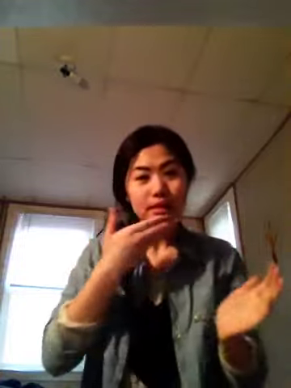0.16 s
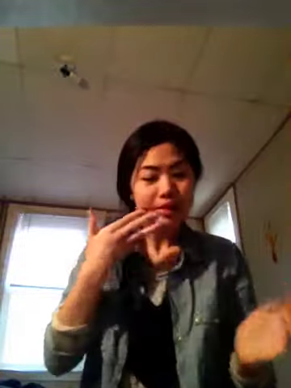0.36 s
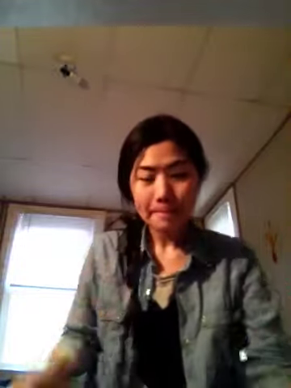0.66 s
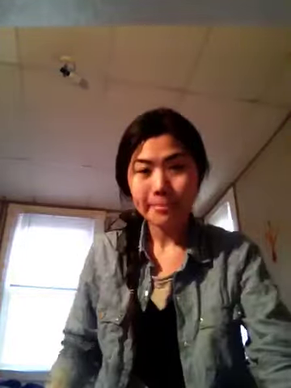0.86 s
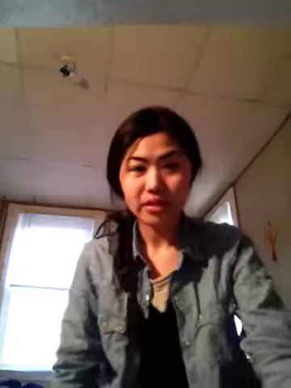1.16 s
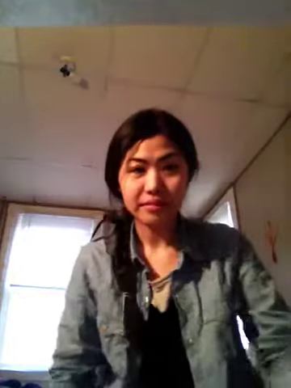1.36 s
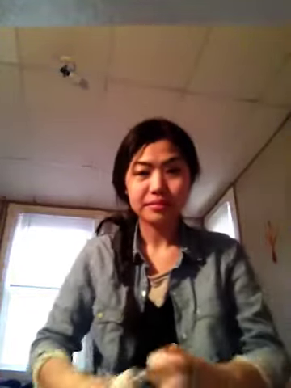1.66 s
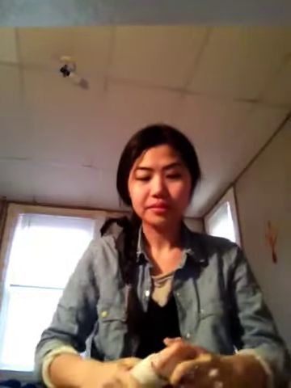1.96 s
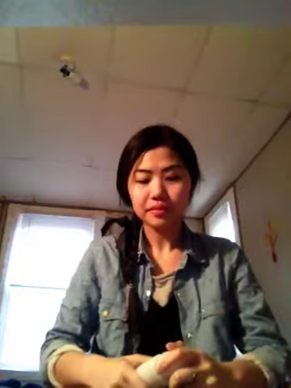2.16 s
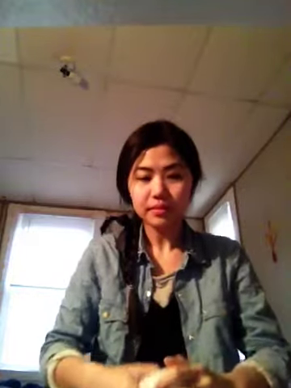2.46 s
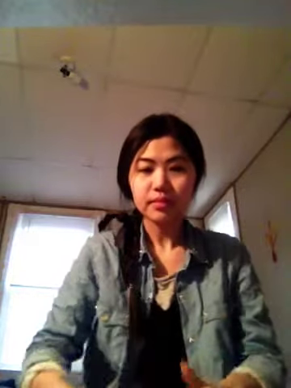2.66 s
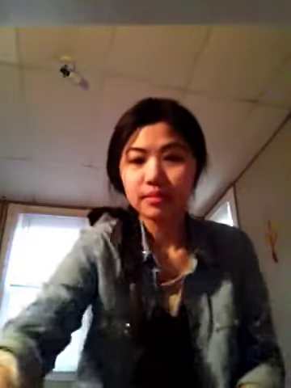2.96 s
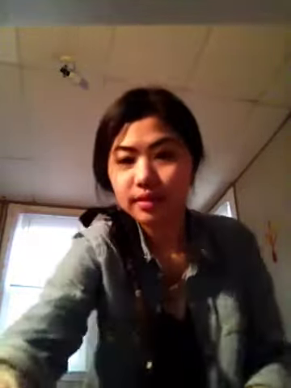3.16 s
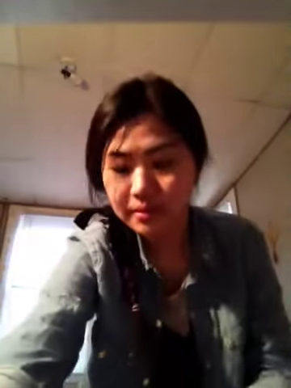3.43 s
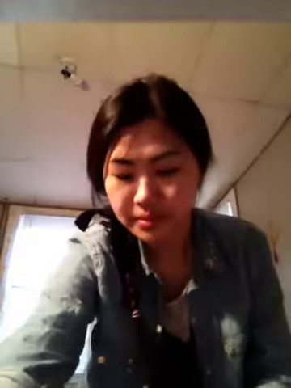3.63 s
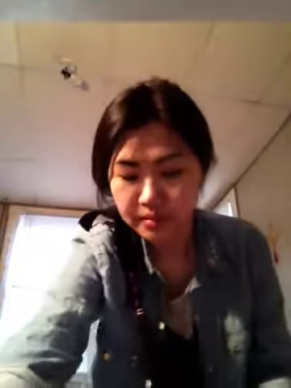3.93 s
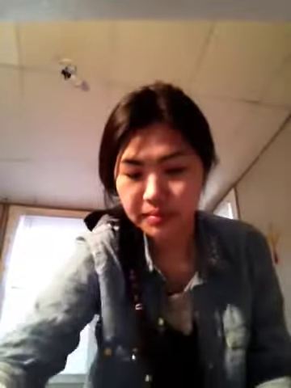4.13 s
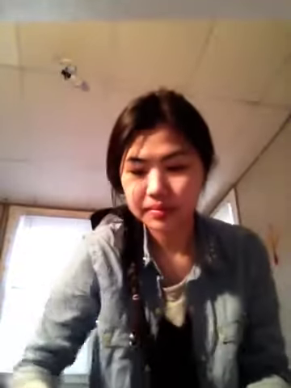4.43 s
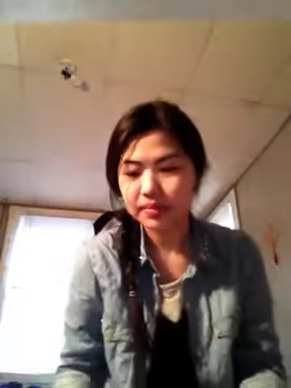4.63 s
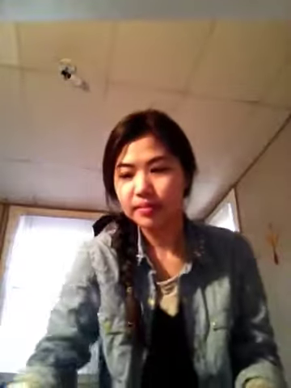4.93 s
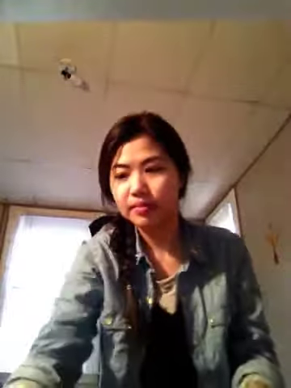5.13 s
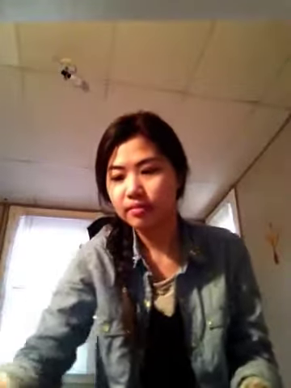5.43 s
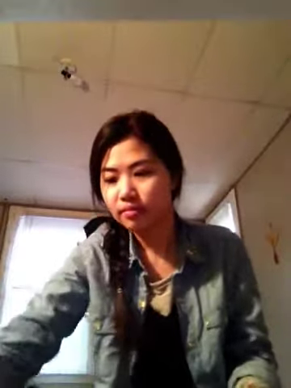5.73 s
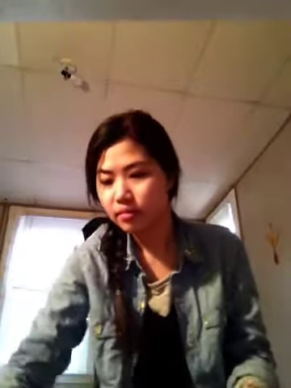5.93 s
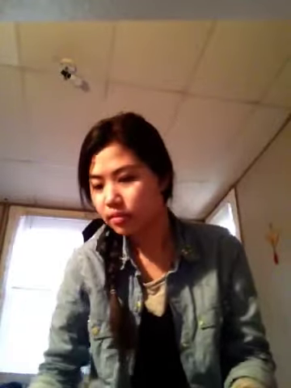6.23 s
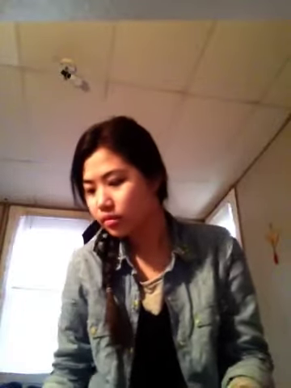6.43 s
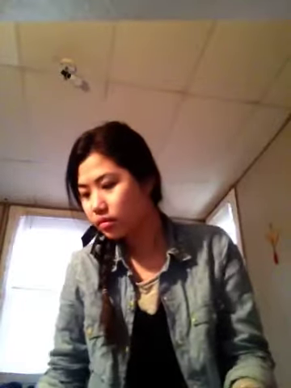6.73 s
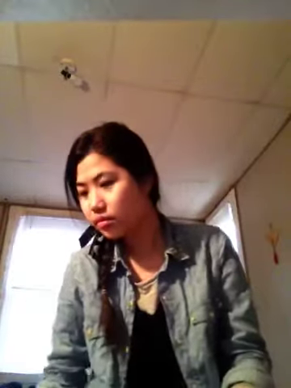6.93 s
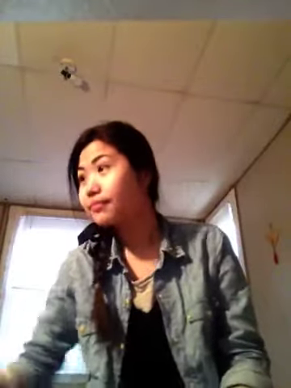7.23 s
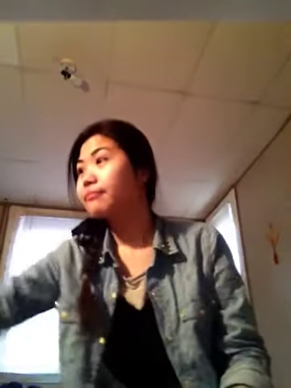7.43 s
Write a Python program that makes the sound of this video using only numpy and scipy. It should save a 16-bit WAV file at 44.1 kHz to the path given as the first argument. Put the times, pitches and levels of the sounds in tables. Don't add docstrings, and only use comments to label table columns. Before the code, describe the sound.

Small hard plastic jars, caps and tubes snap, knock, slide and click on a wooden desk in a quiet, faintly humming room.

```python
import sys
import numpy as np
from scipy import signal
from scipy.fft import rfft, irfft, next_fast_len
from scipy.io import wavfile
from scipy.ndimage import uniform_filter1d, map_coordinates

SR = 44100
rng = np.random.default_rng(int(sys.argv[2]) if len(sys.argv) > 2 else 0)


def field_ratio(decibels):
    return 10 ** (np.asarray(decibels, dtype=float) / 20)


def dump(signal):
    limited = np.clip(np.atleast_2d(signal).T, -1, 1)
    pcm = np.round(limited * 32767).astype(np.int16)
    wavfile.write(sys.argv[1], SR, pcm)


N = 334763

# start_s, peak_db, treble_db, t60_s, pitch_factor
TICK_HITS = [(.044, -50, 9, 0.0027, 0.68), (.076, -59, 15, 0.0078, 0.76), (.142, -57, 13.5, .0054, 1.8),
             (.975, -48, -20, .0067, 1), (1.004, -62, -20, 0.0055, 1.0), (1.099, -45, -6, 0.0036, 1.05),
             (1.294, -50, -9, 0.0033, 0.89), (1.317, -52, -15, .005, 0.94), (1.547, -49, -25, 0.0074, 0.99),
             (2.503, -43.5, -10, 0.0063, 0.49), (2.531, -68.5, 15, 0.0065, .91),
             (2.845, -64.5, 19.5, 0.0073, .71), (2.881, -52, -6, 0.01, 1.05), (2.894, -51, 2, 0.0082, 0.36),
             (3.069, -39.5, 1.5, 0.021, 0.68)]
ELBOW_HITS = [
    (.929, -44.5, -22, 0.031, 0.68),
    (.952, -33, -18, 0.01, 0.94),
    (1.255, -46, -14, 0.014, 0.82),
    (1.299, -46.5, -6, 0.0084, 0.93),
    (1.329, -59, -14, 0.019, 0.51),
]
JAR_HITS = [
    (1.722, -18.5, -7.5, .005, 0.95),
    (1.7295, -25.5, -0.5, .0092, 0.47),
    (1.733, -4.5, -5.5, .007, 0.97),
    (1.752, -27, -15, .0089, 0.73),
    (1.781, -27, -8.5, .021, 0.78),
]
LID_HITS = [
    (1.851, -23, -2.5, 0.011, 0.98),
    (1.862, -27, -13, 0.014, 1.1),
    (1.897, -37.5, -30, 0.012, 0.89),
    (1.942, -39, 5.5, 0.0022, 1.1),
    (1.95, -36.5, -21.5, .0066, 0.93),
]
CAP_HITS = [
    (2.052, -19.5, -0.61, 0.012, 0.99),
    (2.0585, -19, 2.5, 0.0083, 0.9),
    (2.2135, -22.5, -2, 0.008, .8),
    (2.232, -6.5, -1, 0.012, 0.97),
]
CASE_EDGE_HITS = [
    (3.2075, -6, -17, 0.0016, 0.864),
]
CASE_HITS = [
    (3.232, -20, -6, 0.017, 0.62),
    (3.311, -34, 5, 0.027, 0.6),
    (3.387, -28.5, -1.5, 0.013, 1.25),
    (3.45, -32, -4, 0.015, 1.25),
    (3.773, -14.5, -12, 0.012, 0.969),
    (3.79, -22.5, -13.5, 0.006, 0.85),
    (4.106, -23.5, -20, 0.022, 0.48),
]
CASE_FLAT_HITS = [
    (3.221, -33, -13, .01, 1),
    (4.085, -39, 6, 0.019, 0.45),
    (4.0965, -22.5, 0, 0.018, 0.67),
    (4.119, -28, -5, 0.018, 0.92),
]
PILE_HITS = [
    (5.171, -36, -6, .008, 1.17),
    (5.7975, -36, 0, 0.0052, 1.55),
    (5.818, -32.5, -28, 0.014, 0.56),
    (5.849, -31.5, -8, 0.0046, 1.24),
    (5.855, -30, -15, 0.0025, 0.976),
    (5.883, -41, -7, 0.0039, 1.0),
    (6.093, -60, -9.5, 0.015, 0.98),
    (6.119, -57.5, -12.5, 0.014, 0.88),
    (6.198, -69, -6, .015, 0.88),
]
TUBE_HITS = [
    (5.423, -20.5, -8.5, 0.0097, 0.97),
    (5.443, -42, 3, 0.0027, 0.94),
    (5.619, -35, -1.5, 0.034, 1.0),
]
ROLL_HITS = [
    (5.762, -38, -14, .006, 1.03),
    (5.773, -44, -6, .006, 1.1),
]

# centre_hz, width_hz, level_db
TICK_BODY = [(1950, 260, 0), (3850, 1300, -18)]
ELBOW_BODY = [(510, 200, 5), (905, 340, -7.5)]
JAR_BODY = [(850, 300, -30), (1520, 160, -14), (1915, 130, 7), (2229, 150, -12), (3200, 700, -34)]
LID_BODY = [(840, 99, -11.5), (1469, 112, 5.5), (2600, 270, -8), (3730, 890, -14.5)]
CAP_BODY = [(800, 320, 1), (1370, 500, 5.5), (2900, 640, 6.5), (3980, 900, -2.5)]
CASE_BODY = [(620, 360, 3), (764, 66, 6.2), (971, 200, 2), (1640, 500, 2.94), (2610, 120, 1.9)]
PILE_BODY = [(830, 410, 0.5), (1620, 100, 2.9), (2740, 200, 2)]
TUBE_BODY = [(797, 42, -5.5), (1227, 113, -5.5), (1970, 160, -14), (2740, 100, -4.5), (3780, 240, -9)]
ROLL_BODY = [(1100, 180, 12), (1820, 310, -3), (2240, 200, 9.5), (3760, 330, -2)]
# centre_hz, width_hz, level_db
THIN_SHELL = [(3960, 260, -2), (5010, 450, 4.5), (6000, 580, 4.5), (7600, 1700, -1.5), (10600, 2200, -9.5),
              (13200, 2500, -15.5)]
TICK_SHELL = [(5390, 2100, 0.5), (7440, 2000, -9)]
CAP_SHELL = [(4700, 1100, 5.5), (6004, 2000, 5.5), (8856, 3300, -1.5), (12600, 6000, -9)]
# centre_hz, width_hz, level_db
DESK_TOP = [(110, 14, -3.5), (170, 17, 4), (285, 290, -1), (504, 390, -1.5)]
DESK_FRAME = [(66, 14, -16), (87, 7, -5), (118, 8, -8), (176, 8, 2)]
DRAG_BODY = [(870, 51, -7), (1685, 110, 2), (2370, 200, -7)]

# freq_hz, density_db
RUB_SPECTRUM = [(290, -32), (500, -8), (755, -4), (835, -4), (1140, -5), (1260, -1.5), (1580, -3.5),
                (1950, -3), (3200, -11), (4160, -30), (7040, -120)]
FIZZ_SPECTRUM = [(1650, -34), (2800, -2.5), (3300, -1.5), (3780, 2), (4960, 3), (6660, 3), (9590, -10),
                 (12500, -21.5), (15500, -33)]
CLOTH_SPECTRUM = [(5000, -40), (7500, -4), (9500, -6), (13000, -11.5), (15500, -17), (17000, -60)]
AIR_SPECTRUM = [(15, -73), (25, -48), (84, -23), (108, -11), (217, -4.5), (285, -20), (326, -12.5),
                (545, -19), (677, -21), (734, -18), (1190, -20), (1440, -19), (2690, -21.5), (14800, -25),
                (16000, -35)]
# freq_hz, t60_s
ROOM_DECAY = [(200, 0.23), (1000, 0.25), (4000, 0.2), (12000, 0.24)]

# time_s, level_db
HUM_LEVEL = [(0, -86), (1, -74), (2.3, -78), (2.6, -68.5), (2.9, -63), (3.2, -67), (4.4, -74), (5.5, -75),
             (6.1, -70), (6.7, -80), (7.2, -69.5), (7.59, -77)]
# pitch_hz, level_db
FAINT_TONES = [(549, -89.5), (721, -92.5)]
# time_s, change_db
HISS_DUCK = [(2.2, 0.5), (2.5, -2.5), (3.2, 0)]
# start_s, level_db
FRAME_BLOWS = [
    (.955, -60),
    (3.21, -55),
    (3.778, -39),
    (4.106, -36),
]
# time_s, level_db
DRAG_LEVEL = [(3.85, -71), (3.95, -50.5), (4.05, -43.5), (4.09, -41.5), (4.12, -83)]
# peak_s, level_db, rise_20db_s, fall_20db_s, treble_db
LIGHT_STROKES = [(.728, -62, .01, .35, 6), (.8, -50.5, .06, .055, -7), (1.055, -65.5, .035, .05, 3),
                 (1.152, -55, .02, .026, 0), (3.23, -35, .02, .021, -3), (3.335, -49, .022, .15, 5),
                 (3.388, -43, .055, .04, 0), (3.506, -49, .04, .15, -6), (3.582, -44.5, .12, .1, -5),
                 (3.705, -50.5, .24, .045, 3), (3.765, -52, .1, .02, -5), (3.86, -54.5, .08, .15, -11),
                 (3.96, -51.5, .055, .17, 4), (4.07, -46.5, .17, .06, 6), (3.44, -52, .04, .06, -9),
                 (4.12, -52, .03, .07, 2), (4.26, -64, .02, .22, -6), (5.143, -59, .007, .08, 4),
                 (5.205, -53.5, .03, .06, -3), (5.255, -54.5, .045, .045, -3),
                 (5.318, -45.5, .028, .045, 0), (5.485, -53.5, .045, .022, 0), (5.59, -63, .12, .03, -4),
                 (5.701, -68, .04, .3, 4), (6.1, -56.5, .04, .04, -2), (6.195, -65.5, .07, .06, 2)]
# peak_s, level_db, rise_20db_s, fall_20db_s, treble_db
PRESSED_STROKES = [(.96, -60, .012, .12, -9), (3.213, -33, .003, .016, -5), (3.314, -39, .005, .014, 2),
                   (3.775, -32, .003, .014, -8), (5.175, -57.5, .006, .05, 3), (5.44, -47, .008, .03, -15),
                   (5.799, -49, .006, .06, 1), (5.852, -50, .01, .08, -5), (4.15, -57.5, .02, .06, -18),
                   (3.453, -50, .012, .015, 1), (1.32, -73, .15, .1, -3), (3.262, -59, .015, .1, -14),
                   (3.63, -52, .1, .1, .6), (3.787, -44, .005, .05, -3), (4.104, -40, .016, .033, 0),
                   (5.82, -51, .015, .05, -3)]
# peak_s, level_db, rise_20db_s, fall_20db_s
CUFF_STROKES = [
    (4.04, -55, .09, .14),
    (4.104, -48, .04, .05),
    (5.32, -52, .03, .045),
    (5.702, -59, .035, .07),
    (5.772, -52, .015, .015),
    (5.802, -50, .01, .07),
]
# start_s, peak_db,
# pitch_hz, t60_s
SINGLE_RINGS = [(.975, -54, 1900, 0.016), (1.735, -37, 1907, .4), (1.736, -34, 1807, 0.2),
                (1.739, -19, 5820, 0.014), (1.741, -39, 1510, 0.19), (3.336, -39, 1510, .015),
                (3.388, -31, 1620, .03), (3.39, -34, 4870, .015), (3.4, -31.5, 1100, 0.01),
                (3.449, -32, 1150, 0.016), (3.512, -41, 472, 0.034), (3.568, -42, 1350, .02),
                (3.577, -39, 2600, 0.032), (3.604, -41, 443, 0.023), (3.63, -40, 320, 0.025),
                (3.647, -37, 740, 0.013), (3.769, -20.5, 324, 0.018), (3.771, -16, 960, 0.025),
                (3.772, -25, 2400, 0.017), (3.773, -32, 1740, 0.034), (3.785, -34, 472, 0.023),
                (3.812, -39.5, 1070, 0.025), (4.082, -33, 247, .06), (4.096, -25, 493, 0.019),
                (4.1, -27.5, 780, 0.029), (4.104, -31, 277, 0.076), (4.107, -34.5, 180, 0.17),
                (4.111, -38, 114, .36), (4.24, -59, 465, .05), (5.316, -41, 1080, .035),
                (5.48, -54, 760, .03), (5.797, -42, 1140, 0.018), (5.797, -43, 2700, .02),
                (5.81, -35, 1020, 0.016), (5.819, -39, 478, 0.025), (5.849, -36, 1600, 0.025),
                (5.854, -34, 1575, .025), (5.855, -36.5, 3000, .02), (5.865, -54, 1680, 0.018),
                (5.872, -41, 804, 0.017), (5.883, -39, 2900, 0.016), (5.91, -51, 550, 0.026),
                (3.209, -27, 594, .05), (3.79, -44, 179, .3), (2.058, -39.5, 384, 0.018),
                (2.503, -54, 1057, 0.0267), (1.861, -35, 4540, .02), (6.097, -49, 1600, .03),
                (5.424, -31, 1950, .014), (5.62, -43, 2790, .045), (5.625, -45, 1280, .035),
              (5.762, -44, 1170, .035), (5.772, -50, 2700, .025), (5.71, -60, 2300, .03),
              (5.74, -60, 2400, .04), (5.2, -47, 340, .05), (5.443, -46, 2800, .02),
              (5.492, -52, 4200, .015), (5.426, -31, 760, .04)]
# time_s, pitch_hz, level_db
SCRAPE_GLIDE = [
    (3.48, 450, -55),
    (3.515, 597, -51.5),
    (3.55, 1048, -48.5),
    (3.59, 1594, -45.5),
    (3.615, 1690, -60),
]


def unit(x):
    return x / np.sqrt(np.mean(x ** 2) + 1e-20)


def along(points, hz):
    f, v = np.transpose(points)
    return np.interp(np.log(hz + 1), np.log(f + 1), v)


def curves(rows, outside=None):
    s, *columns = np.transpose(rows)
    return [np.interp(np.arange(N) / SR, s, c, outside, outside) for c in columns]


def wobble(rate_hz):
    knots = rng.standard_normal(int(N * rate_hz / SR) + 4)
    return map_coordinates(knots, [np.arange(N) * rate_hz / SR])


def filtered(x, response):
    m = next_fast_len(len(x) + 4096, True)
    return irfft(rfft(x, m) * response(np.fft.rfftfreq(m, 1 / SR)), m)[:len(x)]


def modes(table, factor=1, scattered=False):
    def response(f):
        peaks = []
        for k, (centre, width, db) in enumerate(table):
            damping = 1j * f * width
            peaks.append((-1) ** k * field_ratio(db) * damping / ((centre * factor) ** 2 - f * f + damping))
        return np.linalg.norm(peaks, axis=0) if scattered else sum(peaks)
    return response


def coloured(x, spectrum):
    return unit(filtered(x, lambda hz: field_ratio(along(spectrum, hz))))


def reverberation(x):
    hz, t, z = signal.stft(rng.standard_normal(SR // 3), SR, nperseg=256)
    wall_s = 0.05
    swell_db = 4 * np.exp(-((t - wall_s) / 0.004) ** 2)
    decay_db = -60 * t / along(ROOM_DECAY, hz)[:, None]
    tail = signal.istft(z * field_ratio(swell_db + decay_db), SR, nperseg=256)[1]
    return signal.fftconvolve(x, tail / np.linalg.norm(tail))[:SR // 3]


def landing(table, thud_db):
    return [(*row, thud_db) for row in table]


def contacts(table, body, wet_db, shell=THIN_SHELL):
    out, t = np.zeros(N + SR), np.arange(SR // 8) / SR
    rise_s = .0007
    blow = np.eye(1, len(t), round(rise_s * SR))[0]
    for s, db, treble_db, t60, factor, thud_db in table:
        rattle = field_ratio(-60 * t / t60) * (1 - np.exp(-t / rise_s)) * rng.standard_normal(len(t))
        # level_db, share of blow, resonances, pitch scale, low_hz, high_hz
        parts = [(0, .8, body, factor, 450, 4000),
                 (treble_db, .1, shell, factor ** 0.54, 2500, 13000),
                 (thud_db, 1.5, DESK_TOP, 1, 40, 1500)]
        hit = spread = 0
        for part_db, firm, peaks, scale, low_hz, high_hz in parts:
            band = lambda f: f / (f - 1j * low_hz) / (1 + 1j * f / high_hz) ** 2
            force = rattle + firm * np.linalg.norm(rattle) * blow
            part = filtered(force, lambda f: modes(peaks, scale)(f) * band(f))
            part = field_ratio(part_db) * part / np.max(np.abs(part))
            hit = hit + part
            grid_hz = np.linspace(0, SR / 2, 2049)
            all_round = unit(abs(modes(peaks, scale, True)(grid_hz) * band(grid_hz)))
            spread = np.hypot(spread, np.std(part) * all_round)
        heard = filtered(np.roll(blow, 200), lambda f: np.interp(f, grid_hz, spread) * np.sqrt(len(t)))
        start = round(s * SR)
        out[start:][:len(t)] += field_ratio(db) * hit
        out[start:][:SR // 3] += field_ratio(db + wet_db) * reverberation(heard)
    return out[:N]


def strokes(rows, over_db=0):
    s, db, rise, fall = np.transpose([row[:4] for row in rows])[:, :, None]
    t = np.arange(0, N + 16, 16) / SR
    away = np.maximum((s - t) / rise, (t - s) / fall)
    trim_db, roundness = -0.5, 1.6
    level_db = db + np.reshape(over_db, (-1, 1)) + trim_db - 20 * away ** roundness
    level = np.linalg.norm(field_ratio(np.maximum(level_db, -200)), axis=0)
    return np.interp(np.arange(N) / SR, t, level)


def patchy(x, depth_db):
    z = signal.stft(x, nperseg=256)[2]
    field = uniform_filter1d(rng.standard_normal(z.shape), 4, 0)
    field = uniform_filter1d(field, 8, 1)
    return signal.istft(z * field_ratio(depth_db * unit(field)), nperseg=256)[1][:N]


def grit(rate, spread_db):
    sizes = field_ratio(spread_db * rng.standard_normal(N)) * rng.standard_normal(N)
    slips = (rng.random(N) < rate / SR) * sizes
    clumps = field_ratio(1.8 * wobble(120))
    smooth = 1.2 * rng.standard_normal(N)
    return patchy((unit(slips) + smooth) * clumps, depth_db=1.6)


def room_tone():
    air = filtered(rng.standard_normal(N), lambda hz: field_ratio(along(AIR_SPECTRUM, hz)))
    low = filtered(air, lambda hz: 1 / (1 + (hz / 700) ** 4))
    rumble = field_ratio(-69 + 0.6 * wobble(4.5)) * unit(low)
    hiss = field_ratio(-67 + curves(HISS_DUCK)[0]) * unit(air - low)
    hum_phase = 2 * np.pi * np.cumsum(221 + 5 * wobble(29)) / SR
    hum = np.sin(hum_phase) * field_ratio(curves(HUM_LEVEL)[0] + 2 + wobble(21))
    t = np.arange(N) / SR
    tones = sum(field_ratio(db + 6 + 2.5 * wobble(3.4)) * np.sin(2 * np.pi * hz * t) for hz, db in FAINT_TONES)
    return rumble + hiss + hum + tones


def small_ticks():
    return contacts(landing(TICK_HITS, thud_db=-15), TICK_BODY, wet_db=-11.5, shell=TICK_SHELL)


def slides():
    moves = LIGHT_STROKES + PRESSED_STROKES
    rub = strokes(moves)
    fizz = strokes(moves, [row[-1] for row in moves])
    board = np.hypot(strokes(LIGHT_STROKES, -12), strokes(PRESSED_STROKES, 4.5))
    friction = grit(rate=3800, spread_db=1.5)
    dry = rub * coloured(friction, RUB_SPECTRUM) + fizz * coloured(friction, FIZZ_SPECTRUM)
    dry = dry + field_ratio(curves(DRAG_LEVEL, -120)[0]) * unit(filtered(friction, modes(DRAG_BODY)))
    dry = dry + board * unit(filtered(grit(rate=1400, spread_db=1.5), modes(DESK_TOP)))
    tail = reverberation(np.eye(1, SR // 3)[0])
    return dry + field_ratio(-19) * signal.fftconvolve(dry, tail)[:N]


def elbow():
    return contacts(landing(ELBOW_HITS, thud_db=3), ELBOW_BODY, wet_db=-17)


def frame():
    blows, push = np.zeros(N), np.hanning(SR // 200)
    for s, db in FRAME_BLOWS:
        blows[round(s * SR):][:len(push)] = field_ratio(db) * push
    return 3 * filtered(blows, modes(DESK_FRAME))


def pings():
    out, t = np.zeros(N + SR), np.arange(SR // 3) / SR
    rise_cycles, wet_db = 1.2, -13.5
    for s, db, hz, t60 in SINGLE_RINGS:
        shape = field_ratio(-60 * t / t60) * (1 - np.exp(-t * hz / rise_cycles))
        ring = shape / shape.max() * np.sin(2 * np.pi * hz * t)
        out[round(s * SR):][:len(t)] += field_ratio(db) * (ring + field_ratio(wet_db) * reverberation(ring))
    return out[:N]


def jar():
    snap = contacts(landing(JAR_HITS, thud_db=-59.5), JAR_BODY, wet_db=-7)
    return filtered(snap, lambda hz: (1j * hz / (1j * hz + 800)) ** 2 * field_ratio(1))


def lid():
    return contacts(landing(LID_HITS, thud_db=-30), LID_BODY, wet_db=-8)


def cap():
    return contacts(landing(CAP_HITS, thud_db=-28.5), CAP_BODY, wet_db=-10, shell=CAP_SHELL)


def case():
    corner = landing(CASE_EDGE_HITS, thud_db=-32)
    bounces = landing(CASE_HITS, thud_db=-14.5)
    flat = landing(CASE_FLAT_HITS, thud_db=-1.5)
    return contacts(sorted(bounces + corner + flat), CASE_BODY, wet_db=-20)


def scrape():
    hz, db = curves(SCRAPE_GLIDE)
    t = np.arange(N) / SR
    sounding = (t > SCRAPE_GLIDE[0][0]) * (t < SCRAPE_GLIDE[-1][0])
    width_hz = 330
    turn = 2 * np.pi * np.cumsum(hz) / SR
    noise = wobble(width_hz) * np.sin(turn) + wobble(width_hz) * np.cos(turn)
    return field_ratio(db) * sounding * unit(noise)


def sleeve():
    return strokes(CUFF_STROKES, -1.4) * coloured(grit(rate=5700, spread_db=8), CLOTH_SPECTRUM)


def pile():
    return contacts(landing(PILE_HITS, thud_db=-10), PILE_BODY, wet_db=-5)


def tube():
    return contacts(landing(TUBE_HITS, thud_db=-14.5), TUBE_BODY, wet_db=-11)


def rolling_tube():
    first_s, rib_gap_s, rib_db = 5.5125, .024, -44
    ribs = [(first_s + rib_gap_s * k, rib_db, -20, .0015, 1) for k in range(4)]
    return contacts(landing(ribs + ROLL_HITS, thud_db=-21), ROLL_BODY, wet_db=-5)


def scene():
    room = room_tone()
    near = small_ticks() + slides() + elbow() + pings()
    near = near + jar() + lid() + cap() + case() + scrape()
    near = near + sleeve() + pile() + tube() + rolling_tube()
    radiated = filtered(near, lambda hz: (1j * hz / (1j * hz + 100)) ** 3)
    return (radiated + frame() + room)[None]


def band_limit(x):
    return signal.sosfilt(signal.butter(12, 16460, fs=SR, output="sos"), x)


def record(dry):
    cut = filtered(dry[0], lambda hz: 1 / (1 + (hz / 15450) ** 120))
    return band_limit(cut[None])


dry = scene()
out = record(dry)
dump(out)
```